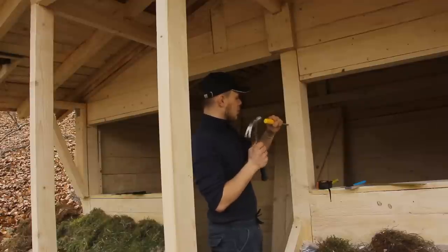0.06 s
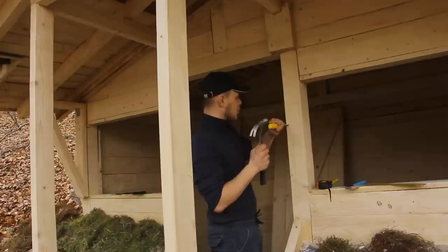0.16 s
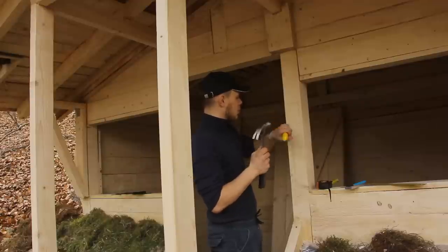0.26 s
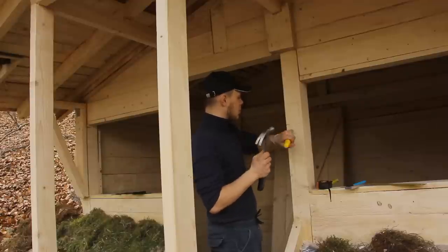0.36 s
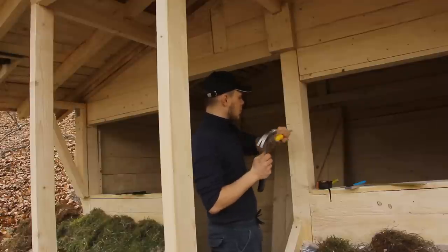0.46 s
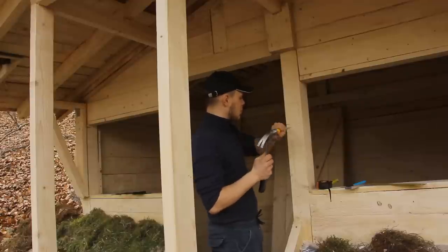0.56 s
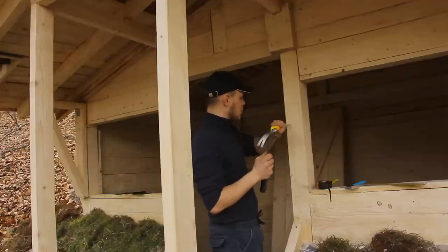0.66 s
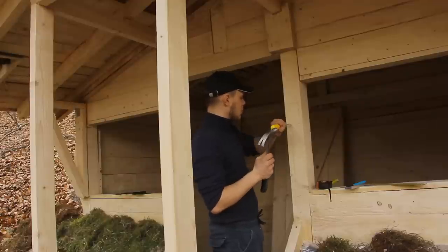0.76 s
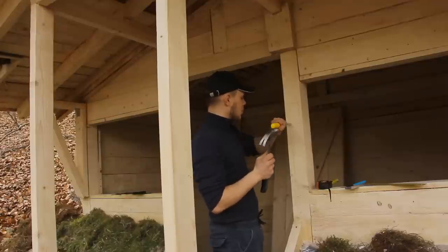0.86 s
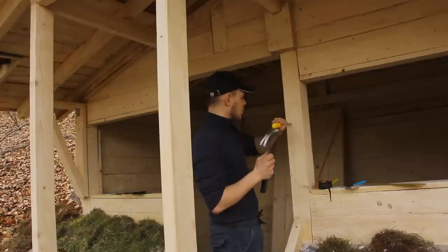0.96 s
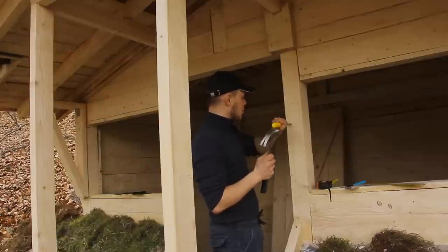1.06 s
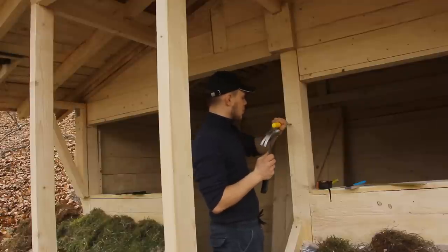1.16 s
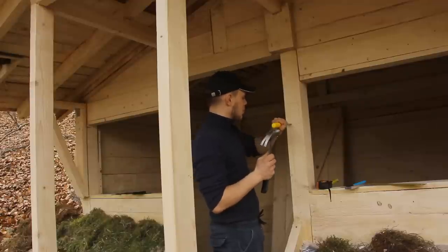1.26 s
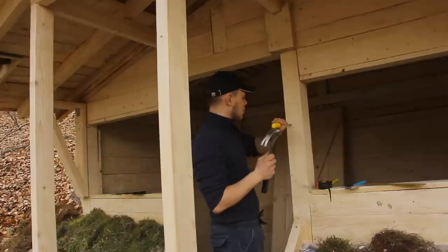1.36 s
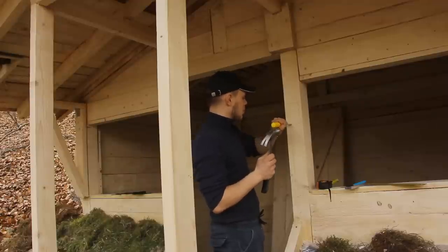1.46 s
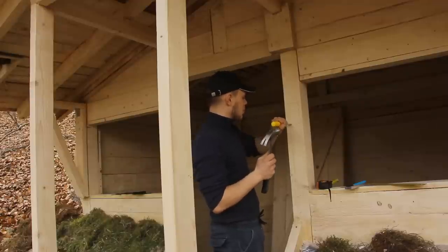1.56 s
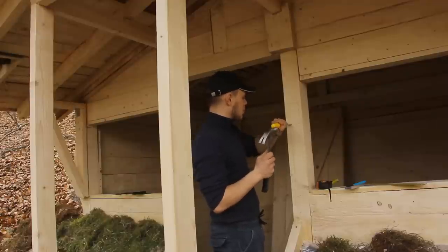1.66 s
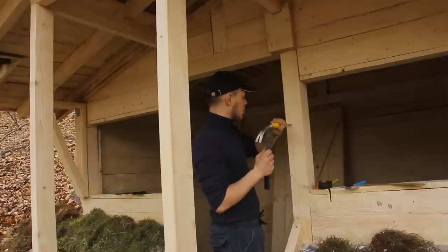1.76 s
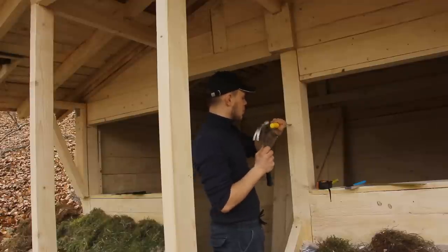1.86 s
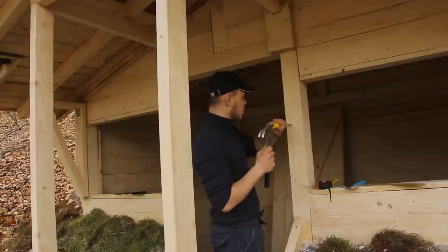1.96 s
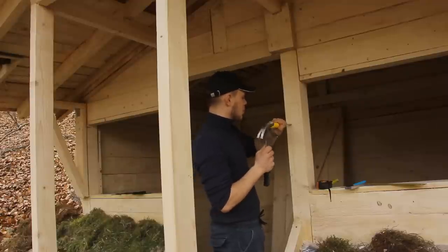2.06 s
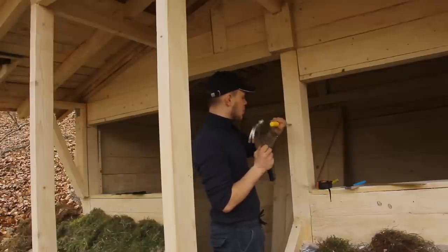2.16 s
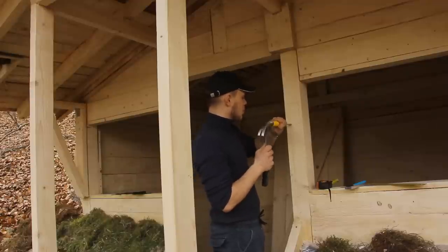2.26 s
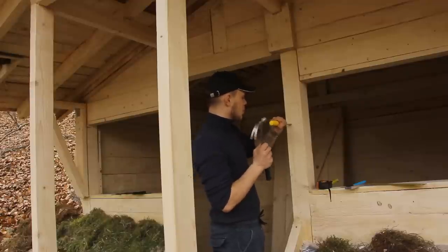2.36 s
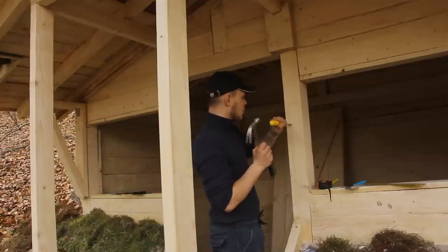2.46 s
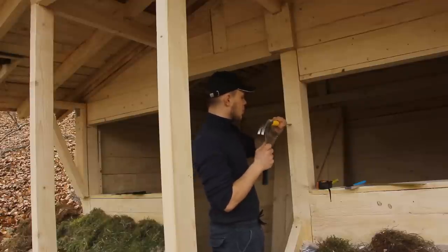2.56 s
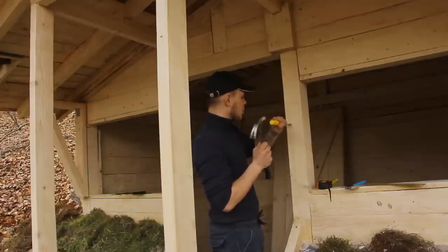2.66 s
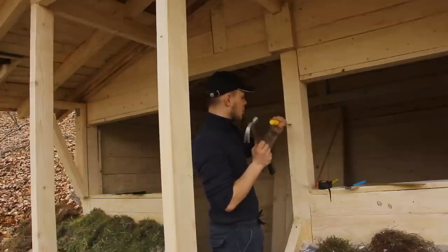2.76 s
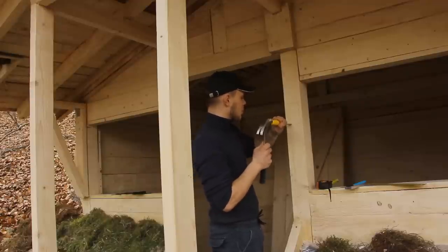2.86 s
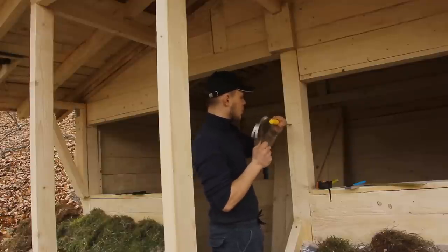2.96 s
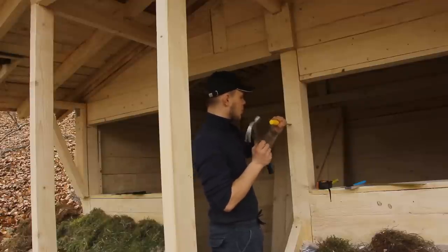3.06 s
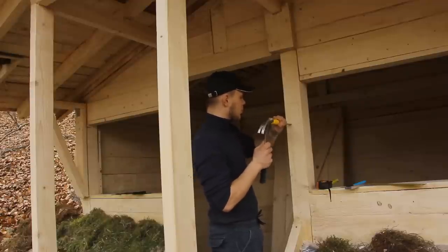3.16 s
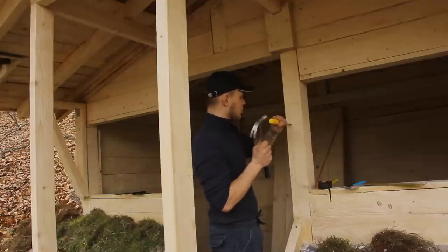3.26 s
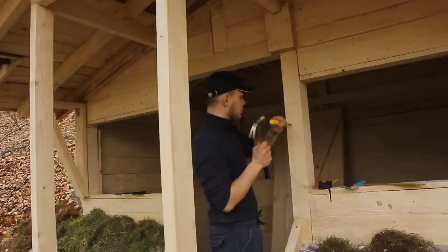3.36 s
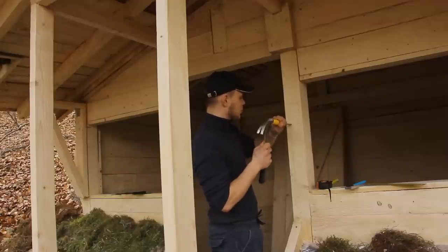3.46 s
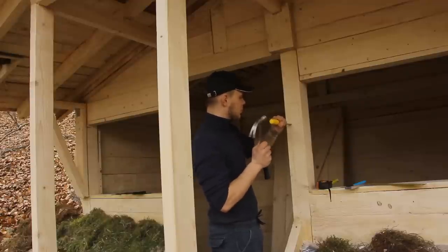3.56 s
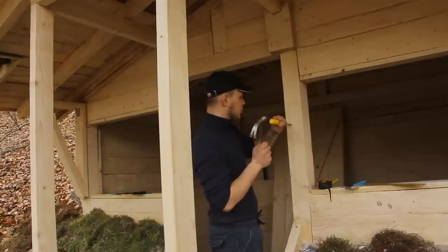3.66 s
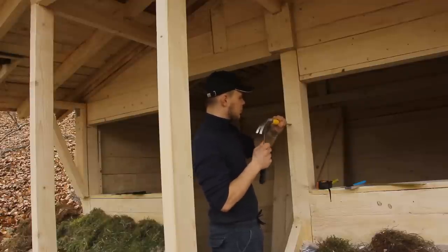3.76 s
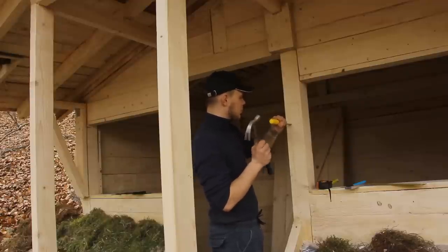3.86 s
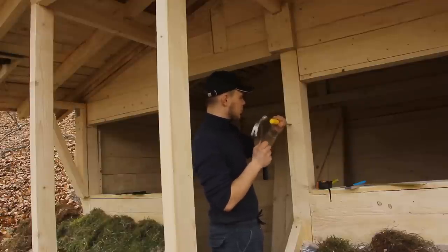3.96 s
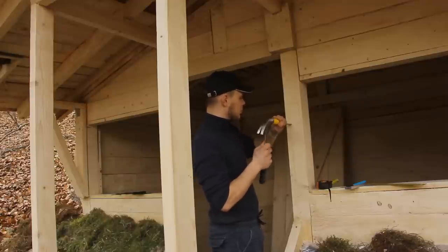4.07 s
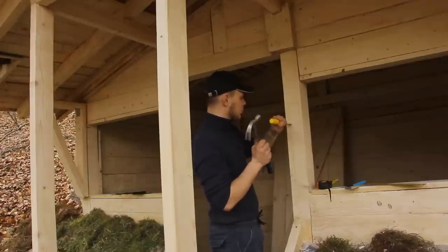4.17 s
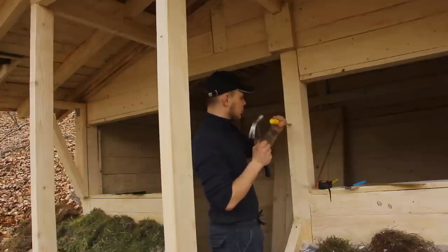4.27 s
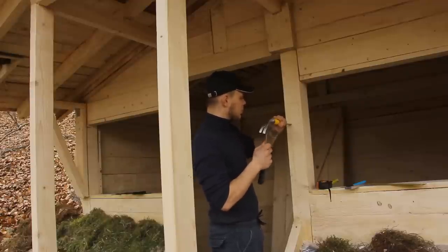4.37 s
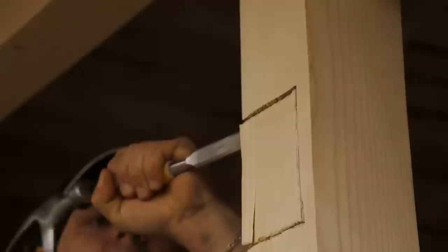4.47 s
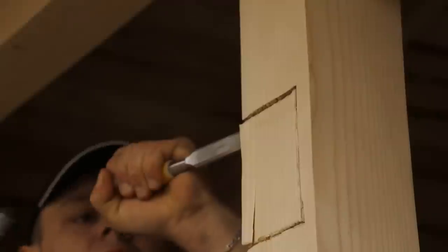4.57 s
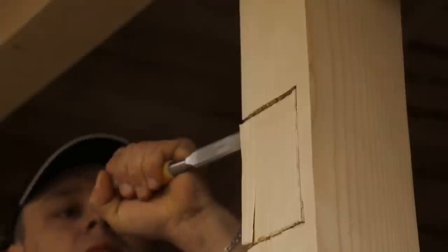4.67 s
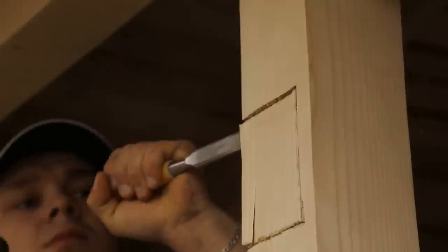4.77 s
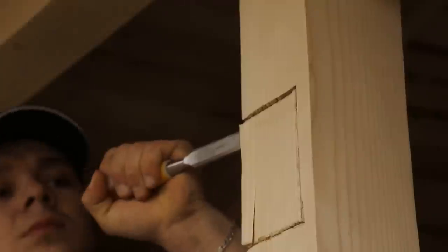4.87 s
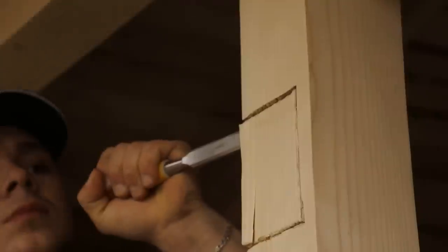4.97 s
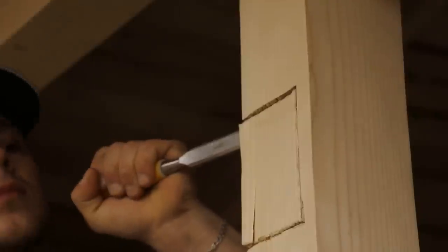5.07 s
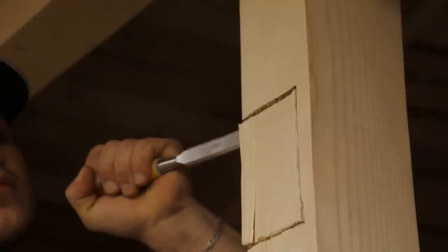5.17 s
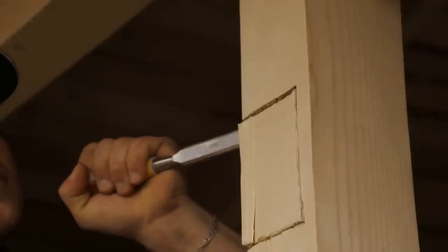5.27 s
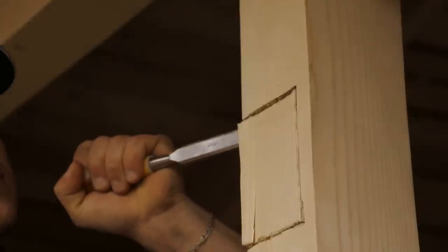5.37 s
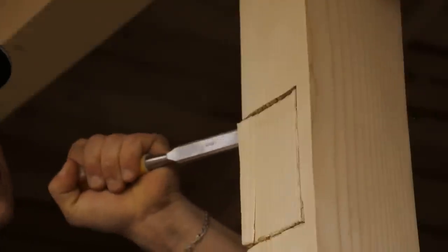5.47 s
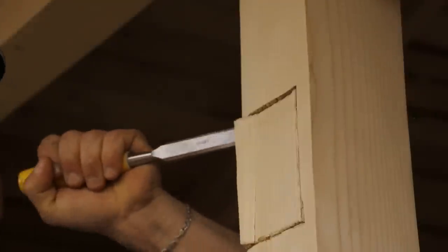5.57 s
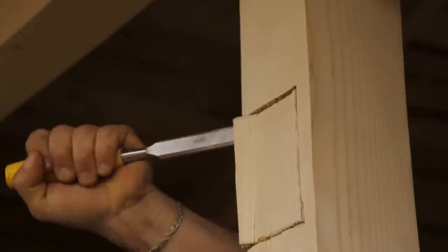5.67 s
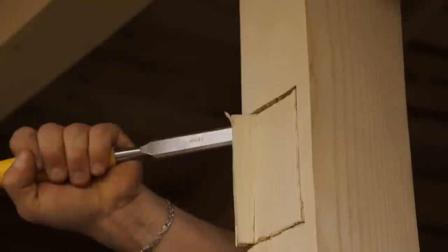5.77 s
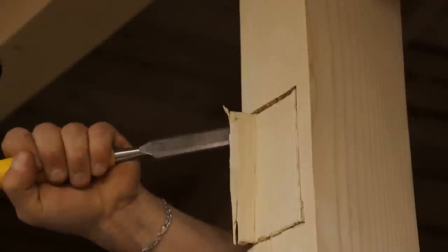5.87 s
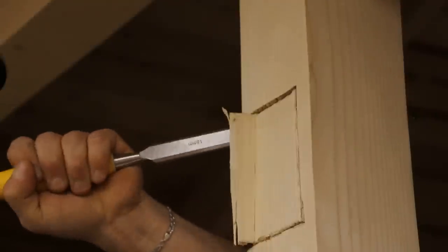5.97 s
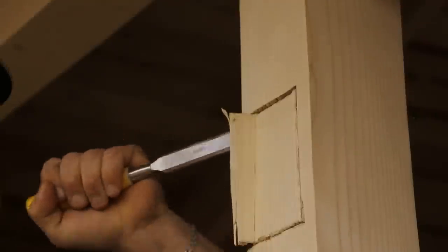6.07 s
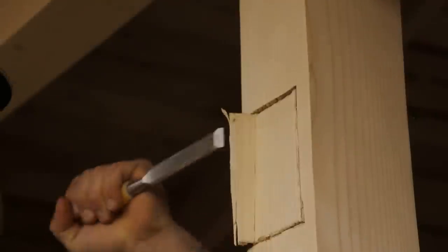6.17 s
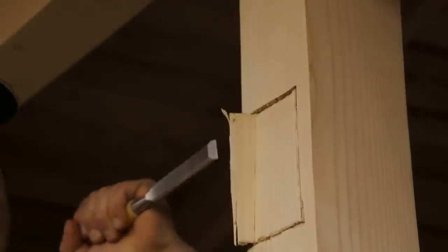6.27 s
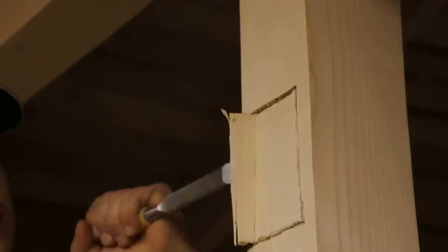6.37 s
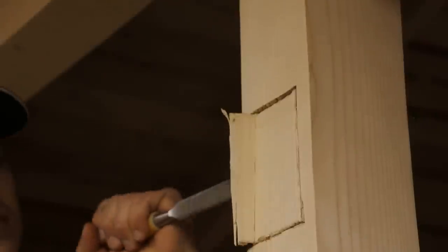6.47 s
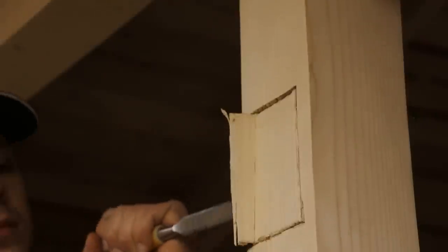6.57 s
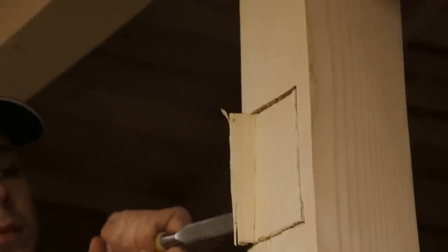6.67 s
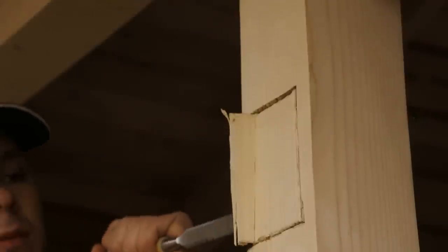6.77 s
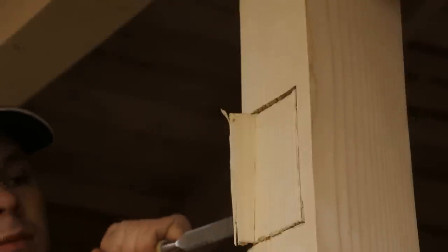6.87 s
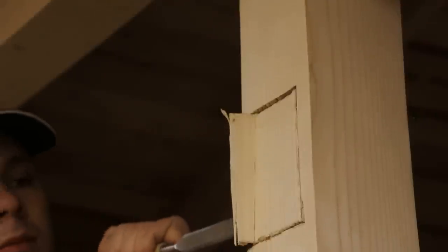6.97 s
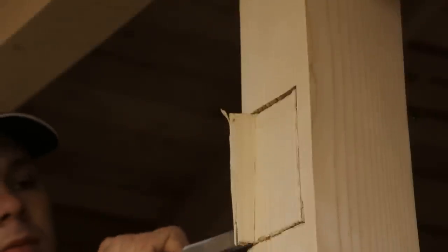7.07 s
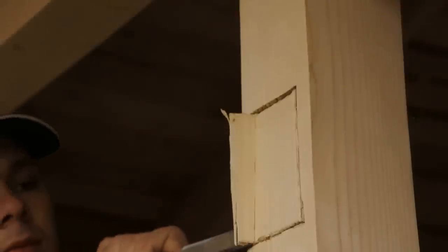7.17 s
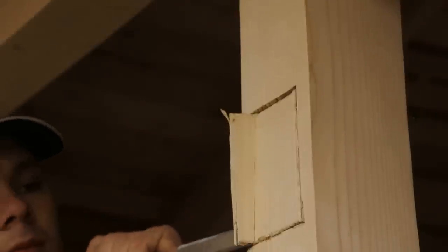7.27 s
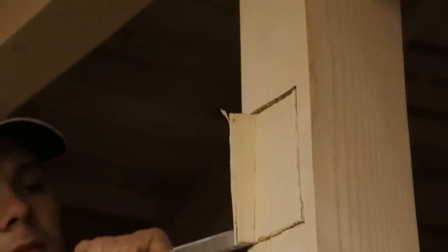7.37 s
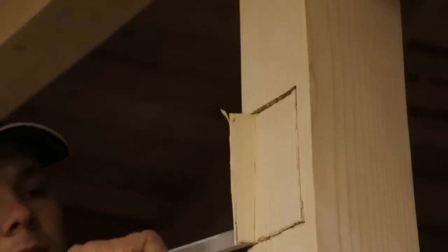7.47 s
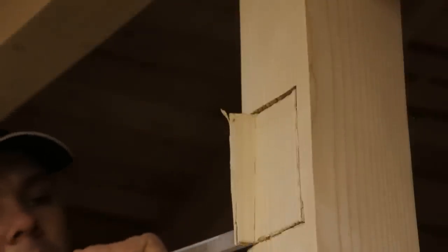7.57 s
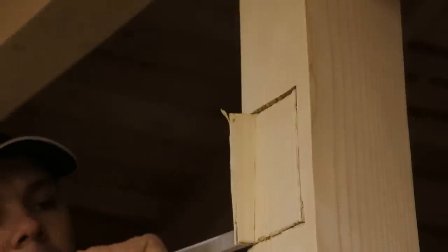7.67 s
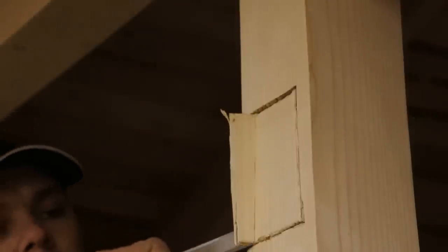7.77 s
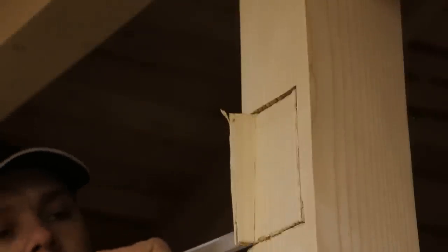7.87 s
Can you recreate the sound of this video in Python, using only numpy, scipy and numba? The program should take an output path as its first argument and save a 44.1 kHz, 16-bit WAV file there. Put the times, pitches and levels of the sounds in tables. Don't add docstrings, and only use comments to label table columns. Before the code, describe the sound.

Spaced, ringing hammer blows on a chisel echo in an open timber shed, then wood fibres crack and tear close up before one last dull knock.

```python
import sys
import numpy as np
from scipy import signal
from scipy.fft import rfft, irfft
from scipy.io import wavfile
from scipy.ndimage import uniform_filter1d
from numba import njit

SR = 44100
rng = np.random.default_rng(int(sys.argv[2]) if len(sys.argv) > 2 else 0)


def dump_mix(stems):
    frames = np.atleast_2d(stems).T
    limited = np.clip(frames, -1, 1)
    pcm = np.round(limited * 32767).astype(np.int16)
    wavfile.write(sys.argv[1], SR, pcm)


def level_to_linear(level):
    exponent = np.asarray(level, float) / 20
    return 10 ** exponent


N = 349713

CUT_S, LEAD_S = 4.498, .25
LEAD = int(LEAD_S * SR)
M = N + LEAD
TIME = (np.arange(M) - LEAD) / SR

# [t/s, strength/dB, thud/dB, ring/dB, shed/dB]
SHALLOW_BLOWS = [
    (2.0426, -3.5, -1, 4.5, -3.5),
    (2.3526, -4, 0.1, 1.5, -0.32),
    (2.6427, -1.5, 3, 2, 0.59),
    (2.9466, 1, 2.5, -3, -0.5),
]
# [t/s, ring level/dB]
DEEP_BLOWS = [
    (3.2408, 3.5),
    (3.5198, 3),
    (3.8053, 3.5),
    (4.0902, 4.5),
    (4.3924, 3),
]
# [t/s, strength/dB, thud/dB, ring/dB, shed/dB]
CLOSE_BLOWS = [
    (7.8137, -.5, 1, -7, -.5),
]
EARLIER_FAR = (-.045, 1.57, -3.5, 1.26, -4)
EARLIER_NEAR = (4.47, 0.1, 3, -4, 4)
DEEP_DB = 0.22
FREE_HZ, SEATED_HZ, CLOSE_HZ = 1576.6, 1510, 1080
SEATED_S, CHISEL_WIDTH_HZ = 2.8, 160

# [f/Hz, width/Hz, level/dB]
FAR_KNOCK = [(600, 300, -1), (1120, 400, -1), (2050, 430, -30), (4000, 800, -3), (5300, 1000, -2.5),
             (6500, 900, -10), (13000, 1800, -17)]
# [f/Hz, width/Hz, level/dB]
SHALLOW_KNOCK = [(660, 250, -1), (1000, 300, 0), (2100, 600, -1), (4000, 900, 1), (5300, 1000, .5),
                 (6500, 900, -6), (13500, 1500, -13)]
# [f/Hz, width/Hz, level/dB]
NEAR_KNOCK = [(420, 75, 3.5), (634, 55, 3), (1900, 700, -5), (2900, 900, -12), (3900, 500, -10),
              (5200, 1500, -15), (9000, 6000, -20), (215, 70, -4)]
# [f/Hz, level/dB, T60/s]
FAR_BEAMS = [(40.93, -24, 1), (123.02, -12.5, 0.412), (183.87, -17, 0.378), (239.26, -11.5, 0.263),
             (411.3, -21, 0.37), (565.7, -15, 0.28), (1054, -19, 0.363), (1266, -35, 0.43),
             (1494, -28, 0.39), (954.2, -20.5, 0.45), (1992, -28, 0.444), (2957, -24.5, 0.373)]
# [f/Hz, level/dB, T60/s]
NEAR_BEAMS = [(60, -28, .3), (137.1, -44.5, .3), (260, -33, 0.85), (338, -27, 0.5), (471.8, -19.5, 0.5),
              (529, -29, 0.66), (815.3, -20.5, 0.19)]
# [f/Hz, level/dB, T60/s]
FAR_STEEL = [(2420, -33.5, .65), (4060, -35, .3), (4410, -33, .3), (7350, -45, .3), (2050, -32, .3),
             (1830, -35, .3)]
# [f/Hz, level/dB, T60/s]
NEAR_STEEL = [(2520, -39, .7)]
# [t/s, f/Hz, level/dB]
OVERTONE = [
    (2.04, 3050, 19),
    (2.35, 3050, 17),
    (2.64, 3050, 17),
    (2.95, 3100, 19),
    (3.24, 3100, 19.5),
    (4.4, 3080, 20),
    (7.8, 2900, 8),
]
OVERTONE_WIDTH_HZ, OVERTONE_LATE_S = 480, .0007
PUNCH_HZ, PUNCH_T60_S, PUNCH_LATE_S, PUNCH_DB = 170, .045, .0033, -12

# [delay/s, level/dB]
FAR_WALLS = [(.0045, -14.5), (.0075, -19), (0.0124, -19)]
# [delay/s, level/dB]
NEAR_WALLS = [(.0021, -12), (.0036, -6), (.0057, -14), (.0085, -14)]
# [f/Hz, level/dB per Hz]
FAR_SHED = [(35, -51.5), (60, -14.5), (117, -8), (251, -6), (355, -5), (727, -7), (1080, -4.5), (1240, -8),
            (1560, -3.5), (1800, -19), (2350, -23), (2800, -17), (3250, -18), (3600, -26), (4300, -23),
            (5700, -26), (6500, -36), (15000, -74.5)]
# [f/Hz, level/dB per Hz]
SHALLOW_SHED = [(35, -46), (60, -8.5), (81, -20.5), (123, -6), (246, -4), (289, -10), (458, -11),
                (605, -10.5), (980, -3), (1240, -16), (1520, -11.5), (2100, -14.5), (2600, -23),
                (3050, -17), (3500, -22), (4510, -23), (5700, -24), (6600, -34), (15000, -62)]
# [f/Hz, level/dB per Hz]
NEAR_SHED = [(35, -40), (60, -15), (200, -6), (480, -2.5), (577, -4), (648, 1), (1210, -9), (1360, -2.5),
             (2260, -19), (3300, -21), (4500, -19), (5820, -21), (15000, -51)]
# [f/Hz, T60/s]
SHED_T60 = [(60, 0.579), (250, 0.5186), (1000, 0.3895), (3000, 0.41), (7000, 0.35), (14000, 0.29)]

# [f/Hz, level/dB per Hz]
FAR_AIR = [(15, -57), (25, -22), (87, -15.5), (149, -12), (200, -17.5), (384, -19.5), (463, -8), (607, -18),
           (695, -14), (1890, -21.5), (6050, -30.5), (14800, -35.5), (16000, -36.5)]
# [f/Hz, level/dB per Hz]
NEAR_AIR = [(15, -50), (25, -4), (76, -12), (130, -5.5), (185, -12.5), (344, -12), (451, -7), (531, -10.5),
            (1610, -10), (2110, -13.5), (6210, -20.5), (14400, -24.5), (16000, -28.5)]
FAR_AIR_DB, NEAR_AIR_DB = -48, -51.5

# [t/s, length/s, f/Hz, level/dB]
THIN_TONES = [
    (1.1, 0.08, 3730, -64),
    (1.53, 0.08, 3625, -58),
    (1.64, 0.06, 3650, -64),
    (1.85, .04, 3200, -64),
    (4.62, .11, 2520, -48.5),
    (4.73, .07, 2520, -57),
    (.02, .18, 2420, -57),
]
# [t/s, length/s, f/Hz, first partial level/dB, second partial level/dB]
COCK = [
    (7.21, .15, 716, -58, -68),
    (7.35, 0.112, 722, -69, -54.5),
    (7.49, .045, 785, -68, -58),
    (7.53, .27, 720, -68, -64),
    (7.55, .09, 765, -55, -70),
    (7.628, 0.206, 778, -56, -53),
    (7.49, .18, 640, -63, -75),
]
NOTE_EDGE_S = .025

# [t/s, peak level/dB, rise/s per 10 dB, fall/s per 10 dB]
RUSTLES = [(.12, -50, 0.021, .02), (.25, -47.5, 0.074, 0.0727), (.412, -49, 0.009, 0.0242),
           (.63, -52.5, 0.14, 0.03), (.68, -55.5, 0.0204, 0.03), (.816, -47, 0.0218, 0.056),
           (.944, -52.5, 0.09, 0.11), (1.204, -49, 0.0346, 0.0763), (1.358, -46.5, 0.042, .03),
           (1.704, -50, .04, .03), (1.89, -46, .045, .09), (1.395, -49, .015, .03)]
CLOTH_TOP_DB = -10

# [t/s, f/Hz, level/dB]
FAR_MOTOR = [
    (0.3, 167.8, -57),
    (0.36, 168.3, -61),
    (0.408, 158, -51.5),
    (0.488, 146.1, -55.5),
    (0.578, 146.4, -52),
    (0.658, 154, -53),
    (1.132, 159, -51.5),
    (1.302, 144.3, -51),
    (1.55, 145.9, -52),
    (2.0, 150.8, -51),
]
# [t/s, f/Hz, level/dB]
NEAR_MOTOR = [
    (4.6, 130.8, -53),
    (5.3, 130.8, -53.5),
    (6.0, 132, -57.5),
    (6.5, 132, -58),
    (7.1, 133.1, -62.5),
    (7.9, 132.3, -70),
]
UNDERTONE_HZ, UNDERTONE_DB = 124, -58.5

# [t/s, peak level/dB, f/Hz, T60/s, tick level/dB]
BUMPS = [
    (.409, -44.5, 477, 0.064, 7),
    (1.0976, -33.5, 349, 0.179, -23.5),
    (6.167, -41, 400, 0.095, -10.5),
    (6.607, -31.5, 414, 0.107, -19.5),
    (6.758, -30.5, 260, 0.11, -14.5),
    (6.979, -60.5, 310, 0.118, -6.5),
    (7.1396, -31, 245, 0.091, -10.5),
    (7.498, -44, 275.4, 0.088, -8.5),
    (7.634, -44.5, 420, 0.092, -2),
]

# [t/s, level/dB, length/s, centre f/Hz]
SCRAPES = [
    (6.178, -41, .017, 6500),
    (6.18, -40, .017, 12500),
    (6.21, -53, .015, 5500),
    (7.131, -38, .006, 7600),
    (7.131, -40, .006, 12500),
    (7.147, -47, .008, 4500),
    (5.985, -48, .025, 11500),
    (3.641, -52, .002, 9000),
    (6.063, -52, .002, 11000),
]

# [t/s, peak level/dB, body level/dB, top level/dB, ring f/Hz]
CRACKS = [(5.3147, -12, -10, -10, 4200), (5.319, -17, -10, -4, 4200), (5.3215, -8, -14, -18, 5500),
          (5.33, -22, -12, -2, 5500), (5.3467, -22, -14, -2, 6500), (5.3567, 2, -18, -13, 3850),
          (5.368, -19.5, -10, -4, 5000), (5.377, -17, -15, -2, 4200), (5.3922, 5, -18, -10, 3800),
          (5.394, -5, -18, -12, 5800), (5.403, -14, -20, -6, 5500), (5.5412, -14, -6, 0, 5000),
          (5.5435, -12, -6, -10, 5600), (5.5455, -15, -6, -10, 4000), (5.5515, -17, -13, -8, 5500),
          (5.5535, -16, -13, -4, 5500), (5.5628, -12, -10, 0, 6000), (5.564, -1, -4, -4, 5300),
          (5.5662, 0, -6, -10, 2700), (5.5685, -8, -5, -14, 2300), (5.5755, -17, -6, -6, 5500),
          (5.5886, 1.5, -7, 4, 4900), (5.5928, -4, -6, -6, 5500), (5.599, -16, -10, 2, 5500),
          (5.604, -12, -10, -8, 4800), (5.607, -9, -5, -2, 3700), (5.6108, -10, -6, -4, 5500),
          (5.6135, -4, -5, -16, 3700), (5.638, -3, -8.5, 0, 4500), (5.665, -20, -5.5, -3, 3500),
          (5.6915, -16, -8, -6, 4000), (5.694, -15, -8, -11, 5000), (5.8102, -19, 6, -10, 3800),
          (5.8268, -13, -18, -8, 3600), (5.8375, -15, -14, -4, 5000), (5.8475, -9, -10, -2, 5000),
          (5.8491, 3.5, -6.5, -3, 4500), (5.86, -14, -6, -4, 5000), (5.87, -10, -6, -6, 5000),
          (5.8735, -8, -5, -6, 5000), (5.883, -10, -6, 2, 5000), (5.8905, 3.5, -6, -8, 3500),
          (5.9349, -10, -8, -12, 5200), (5.9637, -13, -10, 0, 4100)]
# [t/s, peak level/dB, top level/dB]
TICKS = [(4.9115, -42, 0), (4.9504, -38, 2), (4.9864, -29, -8), (5.009, -41, 3), (5.075, -37, -6),
         (5.084, -35, -10), (5.098, -36, -6), (5.135, -37, -6), (5.2045, -28, -8), (5.22, -29, -6),
         (5.248, -29, -8), (5.0213, -33, -10), (5.0426, -35.5, -8), (5.0526, -36, -4), (5.1556, -37, -4),
         (5.1699, -29.5, -13), (5.1785, -16, -8), (5.1986, -23, -10), (5.2115, -27, -10), (5.2299, -25, -9),
         (5.2364, -20, -5.5), (5.3, -31.5, -9), (5.345, -26, -2), (5.4555, -24.5, 0), (5.4869, -26, -12),
         (5.5175, -23, 0), (5.7732, -32, 0), (5.8005, -33, 2)]
# [t/s, level/dB]
LEVERAGE = [
    (4.85, -59),
    (5.06, -39),
    (5.264, -32.5),
    (5.396, -38),
    (5.514, -24.5),
    (5.64, -14.5),
    (5.758, -45.5),
    (5.82, -30.5),
    (5.97, -60),
]
# [f/Hz, width/Hz, level/dB]
FIBRE = [(1744, 510, -11), (4100, 800, -0.5), (5600, 1100, -1.5), (8570, 5400, -12.5)]
# [f/Hz, width/Hz, level/dB]
CHIP = [(75, 75, -30), (410, 49, -3.5), (886, 690, -10), (1960, 900, -3.5)]
TICK_BODY_DB, TICK_HZ = -21, 4200
RING_WIDTH_HZ, RING_DB = 500, 4
SNAP_T60_S, TOP_T60_S, SPIKE = .006, .004, 2.5
CRACK_ECHO_S, CRACK_ECHO_DB = .0036, -13
SPLINTER_LOW_HZ, SPLINTER_HIGH_HZ, SPLINTER_DB = 3300, 7000, -2
LOPSIDED = .08

LIMITER_LAG = 160
TOP_HZ = 15750
HISS_DB = -61
STRAY_DB = -45


def unit(x):
    return x / np.sqrt(np.mean(x ** 2))


def along(table, hz):
    f, v = np.transpose(table)
    return np.interp(np.log(np.maximum(hz, 1)), np.log(f), v)


def band(x, lo_hz, hi_hz):
    sos = signal.butter(2, [lo_hz, min(hi_hz, .45 * SR)], "band", fs=SR, output="sos")
    return signal.sosfilt(sos, x)


def resonate(x, peaks):
    out = 0
    for k, (hz, width_hz, db) in enumerate(peaks):
        b, a = signal.iirpeak(hz, hz / width_hz, SR)
        out = out + (-1) ** k * level_to_linear(db) * signal.lfilter(b, a, x)
    return out


def fade(t, t60):
    return np.exp(-np.log(1000) * t / max(t60, .002))


def add(out, s, x):
    i = int(s * SR) + LEAD
    out[i:i + len(x)] += x[:M - i]


def walk(rate):
    k = int(SR / rate)
    steps = np.repeat(rng.standard_normal(size=4000), k)[:M]
    return 1.7 * uniform_filter1d(uniform_filter1d(steps, k), k)


def curve(table):
    s, *cols = np.transpose(table)
    gate = uniform_filter1d(1. * ((TIME > s[0]) & (TIME < s[-1])), size=600)
    return [np.interp(TIME, s, c) for c in cols] + [gate]


def grains(rate, spread_db, smear_s):
    sizes = level_to_linear(spread_db * np.minimum(rng.exponential(size=M), 3))
    clicks = (rng.random(M) < rate / SR) * sizes
    envelope = signal.lfilter([1], [1, -np.exp(-1 / (smear_s * SR))], clicks)
    return unit(envelope * rng.standard_normal(M))


def tone(hz, wobble, flutter_db, multiple=1):
    flutter = level_to_linear(flutter_db * walk(25))
    cycles = np.cumsum(hz * (1 + wobble * walk(30))) / SR
    return 2 ** .5 * flutter * np.sin(2 * np.pi * multiple * cycles)


def note(s, length):
    return np.clip(np.minimum(TIME - s, s + length - TIME) / NOTE_EDGE_S + .5, 0, 1)


def blows(table, knock, walls, beams, shed, shed_db, rings, punch_db):
    out, t = np.zeros(M), np.arange(30000) / SR
    hz = np.fft.rfftfreq(len(t), 1 / SR)
    centres = 62 * 2 ** np.arange(0, 8.4, .5)
    colour = level_to_linear(along(shed, hz))
    shapes = [np.maximum(1 - 2 * abs(np.log2(np.maximum(hz, 1) / c)), 0) * colour for c in centres]
    same, rattle = rng.standard_normal((2, len(t)))
    when, over_hz, over_db = np.transpose(OVERTONE)
    for s, strength_db, thud_db, ring_db, wet_db in table:
        ring_hz = rings[0] if s < SEATED_S else rings[1]
        fresh, grit = rng.standard_normal((2, len(t)))
        push = -np.exp(-(t / .00004 - 3) ** 2)
        chatter = band(rattle + 0.45 * grit, 3500., 6400.) * np.exp(-(t / 0.001988) ** 2)
        contact = push + 0.291 * chatter
        contact = contact + sum(level_to_linear(db) * np.roll(contact, int(lag * SR)) for lag, db in walls)
        post = resonate(contact, knock)
        chisel = resonate(contact, [(ring_hz, CHISEL_WIDTH_HZ, 0)])

        narrow = [(np.interp(s, when, over_hz), OVERTONE_WIDTH_HZ, 0)]
        late_push = np.roll(push, int(OVERTONE_LATE_S * SR))
        overtone = level_to_linear(np.interp(s, when, over_db)) * resonate(resonate(late_push, narrow), narrow)

        thud = 0
        for f, db, t60 in beams:
            level = level_to_linear(db + 1.1 * rng.standard_normal())
            onset = 1 - fade(t, 2.5 / f)
            thud = thud - level * np.sin(2 * np.pi * f * t) * fade(t, t60) * onset

        late = np.maximum(t - PUNCH_LATE_S, 0)
        kick = -level_to_linear(PUNCH_DB + punch_db) * np.sin(2 * np.pi * PUNCH_HZ * late) * fade(late, PUNCH_T60_S)

        echoes = rfft(same + 0.653 * fresh)
        tail = sum(irfft(echoes * g, len(t)) * fade(t, along(SHED_T60, c)) for g, c in zip(shapes, centres))
        onset = 1 - fade(t, 0.0075)
        tail = tail / np.std(tail[:2000]) * onset

        sound = level_to_linear(16.5) * post + level_to_linear(ring_db + 23) * chisel + overtone + kick
        sound = sound + level_to_linear(thud_db - 9) * thud * onset + level_to_linear(wet_db + shed_db) * tail
        add(out, s, level_to_linear(strength_db + 5.5) * sound)
    return out


def air(spectrum, db):
    hz = np.fft.rfftfreq(M, 1 / SR)
    noise = rfft(rng.standard_normal(M)) * level_to_linear(along(spectrum, hz))
    swell = walk(1.11)
    octave = np.log2(np.maximum(hz, 1) / 22)
    out = np.zeros(M)
    for k in range(11):
        flicker = level_to_linear((.6 * swell + 0.54 * walk(9.7)) * (1.5 - k / 12))
        out += irfft(noise * np.maximum(1 - abs(octave - k), 0), M) * flicker
    return level_to_linear(db) * out / np.std(band(out, 140.0, 16000.))


def calls_and_rings():
    out = np.zeros(M)
    for s, length, hz, first_db, second_db in COCK:
        first = level_to_linear(first_db) * tone(hz, 0.005, 2.6)
        second = level_to_linear(second_db + .1) * tone(hz, 0.004, 2.4, multiple=2)
        out += note(s, length) * (first + second)
    for s, length, hz, db in THIN_TONES:
        out += note(s, length) * level_to_linear(db) * tone(hz, 0.0023, 2.9)
    return out


def rustles():
    cloth = grains(rate=2500., spread_db=3, smear_s=.0008)
    middle = unit(band(cloth, 2787.0, 7000.0))
    top = unit(band(cloth, 7000.0, 12500.0))
    swell = np.zeros(M)
    for s, db, rise, fall in RUSTLES:
        swell += level_to_linear(db + 2.5 - 10 * np.maximum((s - TIME) / rise, (TIME - s) / fall))
    return swell * (middle + level_to_linear(CLOTH_TOP_DB) * top)


def motor(table):
    hz, db, _ = curve(table)
    return level_to_linear(db + 1.0) * (tone(hz, 0.0059, 1.1) + level_to_linear(-14) * tone(hz, 0.022, 4., multiple=3))


def bumps():
    out, t = np.zeros(M), np.arange(13000) / SR
    for s, peak_db, hz, t60, tick_db in BUMPS:
        grit = rng.standard_normal(len(t))
        body = np.sin(2 * np.pi * hz * t) * fade(t, 0.28 * t60)
        body = body + 0.413 * np.sin(2 * np.pi * 0.6 * hz * t) * fade(t, t60)
        rumble = 0.374 * unit(band(grit, 122.0, 0.996 * hz)) * fade(t, 2.09 * t60)
        tick = level_to_linear(tick_db) * unit(band(grit, 830.0, 3250.0)) * fade(t, 0.065)
        add(out, s, -level_to_linear(peak_db + 1.5) * (body + rumble + tick) * (1 - fade(t, 0.0119)))
    return out


def scrapes():
    grit = grains(rate=2400.0, spread_db=5.5, smear_s=0.00104)
    out = np.zeros(M)
    for s, db, length, hz in SCRAPES:
        swish = unit(band(grit, 0.518 * hz, 1.61 * hz))
        out += level_to_linear(db) * np.exp(-((TIME - s) / length) ** 2) * swish
    return out


def splitting():
    out, t = np.zeros(M), np.arange(2600) / SR
    ticks = [(s, db, TICK_BODY_DB, top_db, TICK_HZ) for s, db, top_db in TICKS]
    for s, peak_db, body_db, top_db, hz in CRACKS + ticks:
        noise = rng.standard_normal(len(t))
        jolt = SPIKE * (t == 0)
        grit = jolt + noise * (fade(t, SNAP_T60_S) + 0.055 * fade(t, 0.1))
        grit = grit + level_to_linear(CRACK_ECHO_DB) * np.roll(grit, int(CRACK_ECHO_S * SR))
        bright = jolt + noise * (fade(t, TOP_T60_S) + 0.09 * fade(t, 0.07))
        mid = level_to_linear(SPLINTER_DB) * band(grit, SPLINTER_LOW_HZ, SPLINTER_HIGH_HZ)
        mid = mid + resonate(grit, [(hz, RING_WIDTH_HZ, RING_DB)])
        body = resonate(grit, CHIP)
        top = band(bright, 7400.0, 16000.0) + 0.8 * band(bright, 9300.0, 12000.0)
        mid, body, top = (part / abs(part).max() for part in (mid, body, top))
        snap = level_to_linear(peak_db + 0.5) * (mid + level_to_linear(body_db + 1.0) * body + level_to_linear(top_db + 3.5) * top)
        add(out, s, snap + LOPSIDED * snap ** 2)

    load_db, gate = curve(LEVERAGE)
    sizzle = grains(rate=1500., spread_db=3.5, smear_s=.0012)
    splinters = unit(resonate(sizzle, FIBRE)) + level_to_linear(-9.5) * unit(band(sizzle, 11000.0, 15000.))
    out += gate * level_to_linear(load_db - 12.5) * splinters

    t = np.arange(12000) / SR
    boards = band(rng.standard_normal(len(t)), 320.0, 8500.0) * fade(t, 0.25)
    return out + level_to_linear(-35.5) * signal.fftconvolve(out, boards)[:M]


@njit
def limit(x, top, slope, attack, release, lag):
    y, e = np.empty(len(x)), 0.
    for i in range(len(x)):
        a = abs(x[max(i - lag, 0)])
        e += (a - e) * (attack if a > e else release)
        y[i] = x[i] * (top / max(e, top)) ** slope
    return y


def camera(x):
    x = limit(x, level_to_linear(-20.0), 0.141, 1 / (0.034 * SR), 1 / (.35 * SR), LIMITER_LAG)
    x = limit(x, level_to_linear(-19), 0.641, 1 / (0.00575 * SR), 1 / (.065 * SR), LIMITER_LAG)
    return np.clip(x, -1, 1)


def scene():
    small = rustles() + scrapes() + bumps() + calls_and_rings()
    deep = [(s, DEEP_DB, DEEP_DB, ring_db, DEEP_DB) for s, ring_db in DEEP_BLOWS]
    rings = (FREE_HZ, SEATED_HZ)
    far_modes = FAR_BEAMS + FAR_STEEL
    far = blows([EARLIER_FAR] + deep, FAR_KNOCK, FAR_WALLS, far_modes, FAR_SHED,
                shed_db=-17.5, rings=rings, punch_db=-3)
    far += blows(SHALLOW_BLOWS, SHALLOW_KNOCK, FAR_WALLS, far_modes, SHALLOW_SHED,
                 shed_db=-16.0, rings=rings, punch_db=-2.5)
    far += motor(FAR_MOTOR) + level_to_linear(UNDERTONE_DB) * tone(UNDERTONE_HZ, 0.0064, 1.9)
    far += air(FAR_AIR, FAR_AIR_DB)
    near = blows([EARLIER_NEAR] + CLOSE_BLOWS, NEAR_KNOCK, NEAR_WALLS, NEAR_BEAMS + NEAR_STEEL, NEAR_SHED,
                 shed_db=-23, rings=(CLOSE_HZ, CLOSE_HZ), punch_db=-20)
    near += splitting() + motor(NEAR_MOTOR) + air(NEAR_AIR, NEAR_AIR_DB)
    mono = np.where(TIME < CUT_S, camera(far + small), camera(near + small))[LEAD:]
    return np.array([mono, mono])


def band_limit(x):
    return signal.sosfilt(signal.butter(12, 16470, fs=SR, output="sos"), x)


def record(dry):
    dry = signal.sosfilt(signal.ellip(8, .2, 40, TOP_HZ, fs=SR, output="sos"), dry)
    dry = signal.sosfilt(signal.butter(2, 32., "high", fs=SR, output="sos"), dry)
    dry = np.clip(dry, -1, 1)
    trace = level_to_linear(HISS_DB) * band(rng.standard_normal(N), 30., 15800.)
    trace = trace + level_to_linear(STRAY_DB) * dry[0] * walk(40)[:N]
    return band_limit(dry + np.array([trace, -trace]))


dry = scene()
out = record(dry)
dump_mix(out)
```